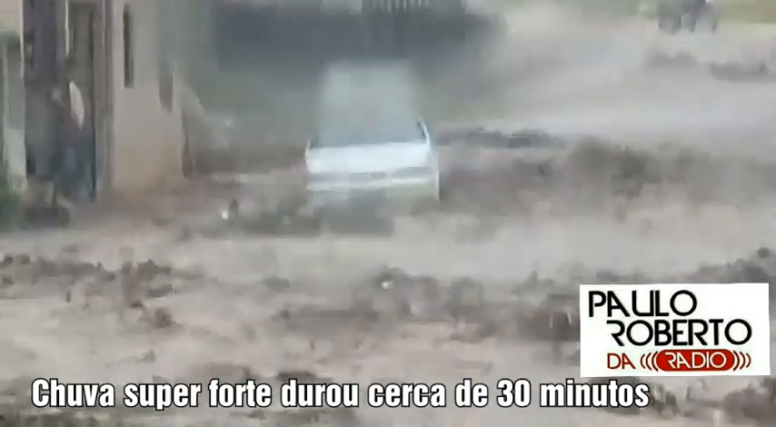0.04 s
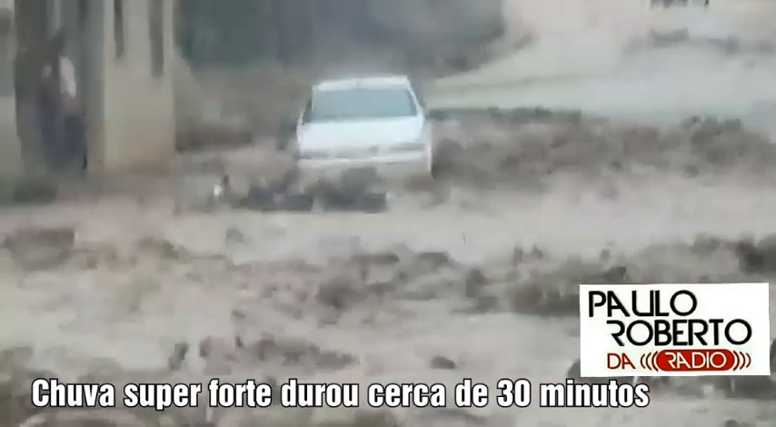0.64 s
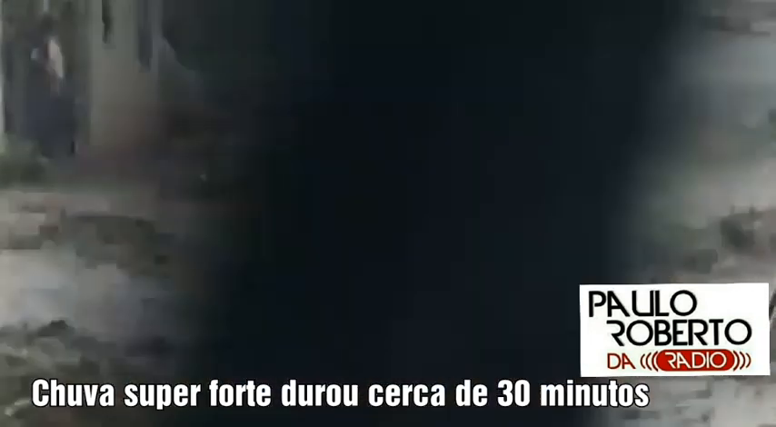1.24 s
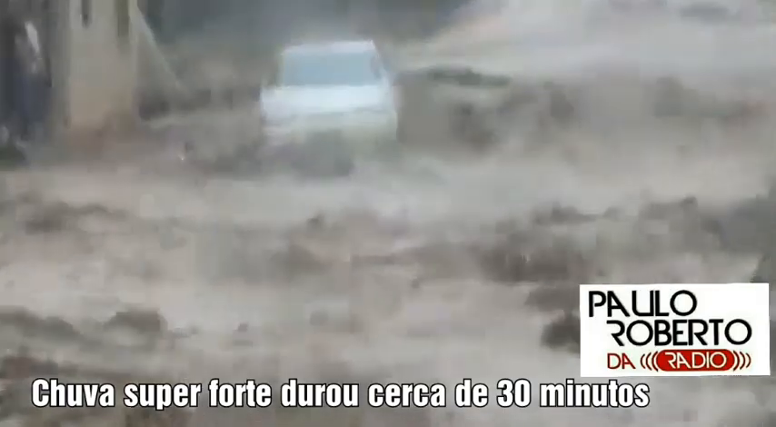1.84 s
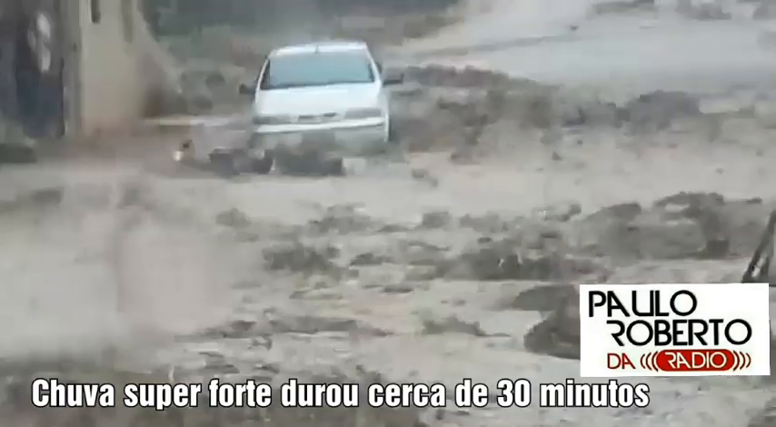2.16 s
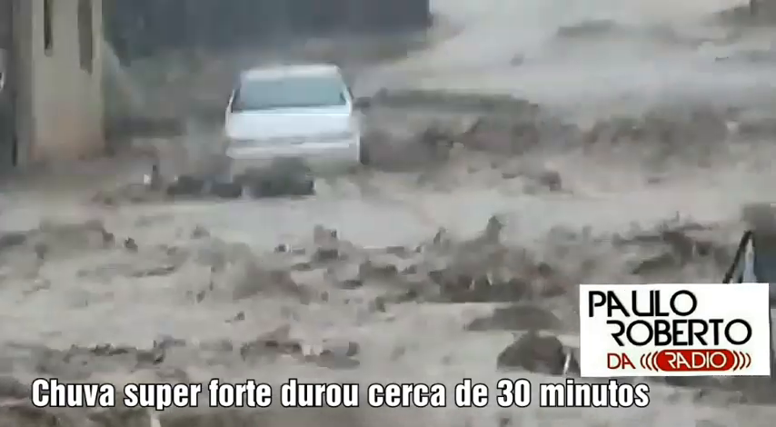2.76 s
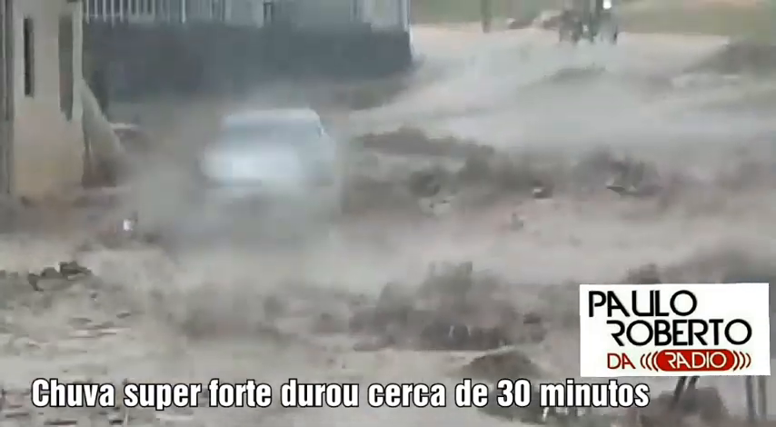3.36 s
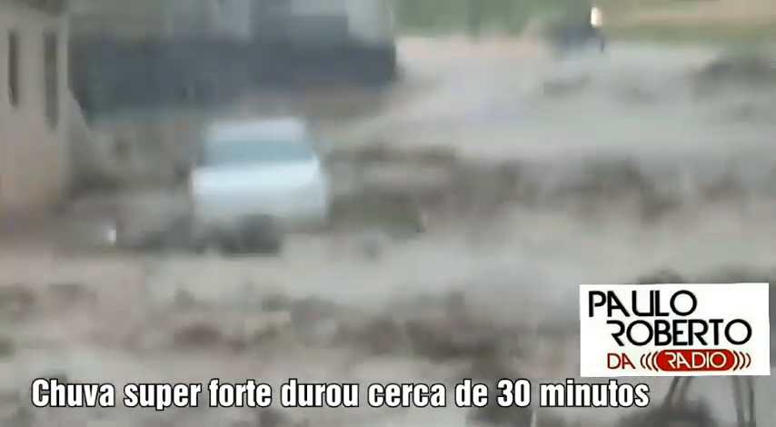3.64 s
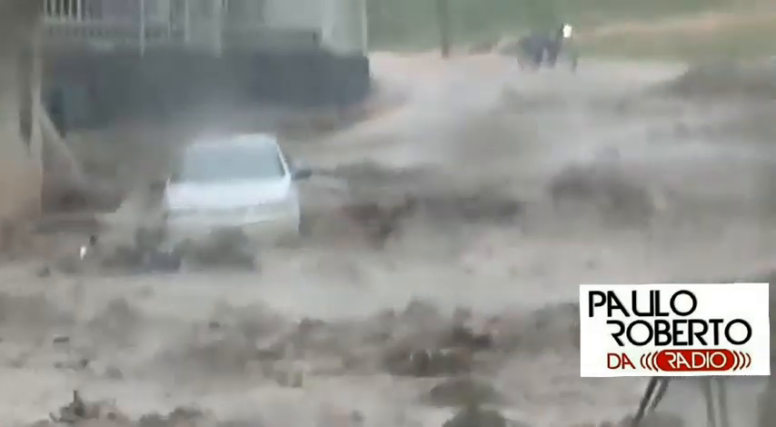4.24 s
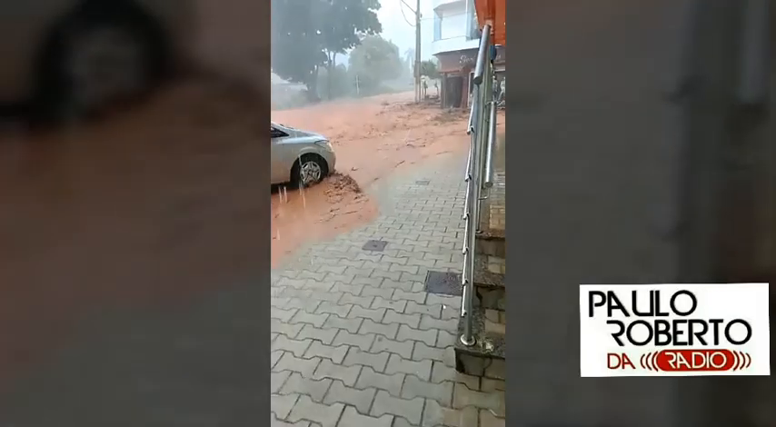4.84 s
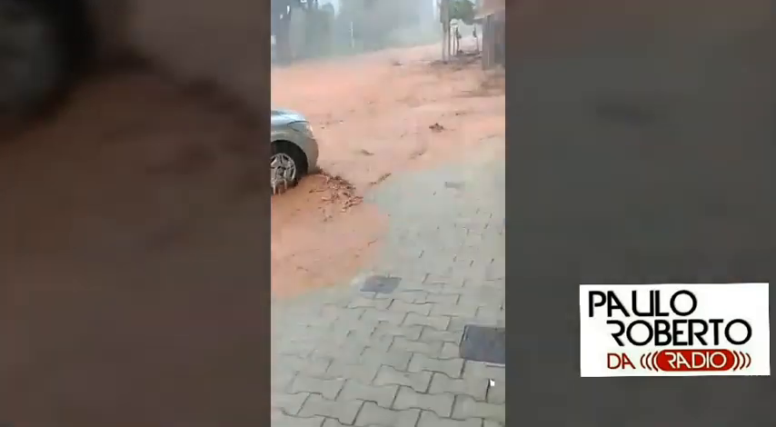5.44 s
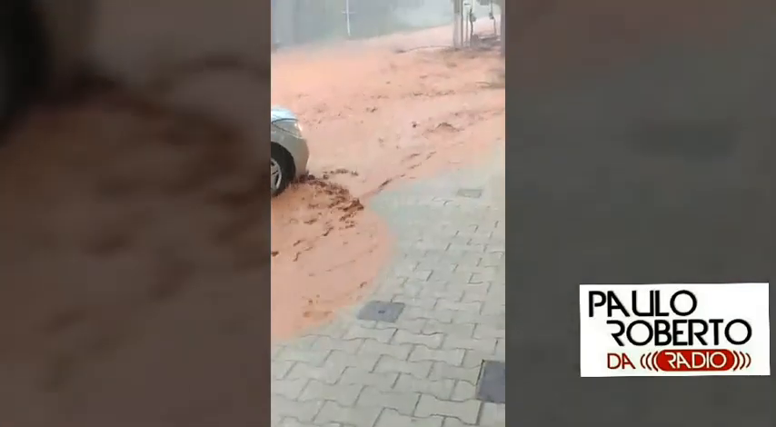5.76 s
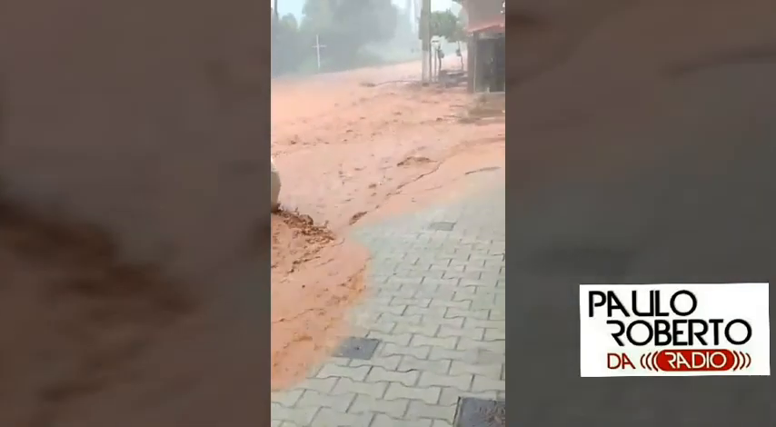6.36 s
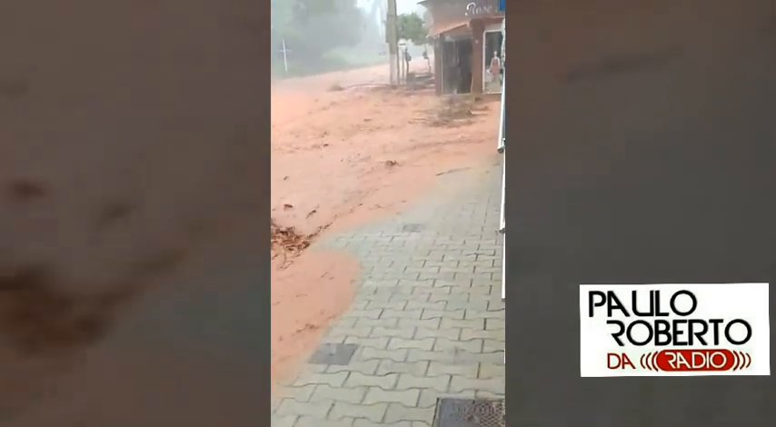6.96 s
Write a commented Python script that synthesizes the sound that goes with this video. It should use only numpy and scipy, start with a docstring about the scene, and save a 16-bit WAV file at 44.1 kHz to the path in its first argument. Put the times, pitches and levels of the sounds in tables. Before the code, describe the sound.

Muffled rain, thumping wipers and a ticking turn signal over engine hum give way to rushing water and splashing rain in a street.

```python
"""A flooded street in a downpour

First we sit in an idling car: rain drums on the body, water slaps it, the wipers thump the
windscreen and the indicator's relay (an electric switch) ticks. After a short silence we are
outdoors, where muddy water rushes down the street and raindrops spatter on the paving."""
import sys
import numpy as np
from scipy import signal
from scipy.fft import rfft, irfft
from scipy.io import wavfile
from scipy.ndimage import uniform_filter1d

SR = 44100
rng = np.random.default_rng(int(sys.argv[2]) if len(sys.argv) > 2 else 0)


def master_out(mix):
    """Clip the mix to full scale and print it as 16-bit PCM to the path in sys.argv[1]."""
    frames = np.transpose(np.atleast_2d(mix))
    ceiling = np.clip(frames, -1, 1)
    pcm = np.round(ceiling * 32767).astype(np.int16)
    wavfile.write(sys.argv[1], SR, pcm)


N = 309141
TIME = np.arange(N) / SR
CAR_ENDS_S, STREET_STARTS_S = 4.527, 4.759

# Surges in the street. Each row: time in seconds, relative level in dB of the torrent, then of the spray.
STREET_SURGES = [(4.93, -33.5, -34), (5.02, -33.5, -32.5), (5.09, -31, -33), (5.14, -34, -35),
                 (5.2, -32.5, -32.5), (5.23, -37.0, -36), (5.34, -32.5, -33.0), (5.41, -34, -32.5),
                 (5.56, -31, -31), (5.76, -31, -31), (5.83, -30, -29.5), (5.97, -27.5, -28),
                 (6.08, -30, -30), (6.2, -31, -29.5), (6.3, -33, -32), (6.45, -30, -31.5),
                 (6.6, -30.5, -29.5), (6.68, -31, -34), (6.77, -32.5, -32.5), (6.83, -30.5, -31.5),
                 (6.92, -28, -31), (6.98, -32, -31.5)]


def gain_of(db):
    """Turns decibels (dB) into a number to multiply a sound by."""
    return 10 ** (np.asarray(db) / 20)


def unit_level(x):
    """Scales a signal so that its average power is one."""
    return x / np.sqrt(np.mean(x ** 2) + 1e-20)


def at_pitch(rows, hz, column=1):
    """Reads a table's column at any frequency, sliding between rows on a musical scale."""
    table = np.transpose(rows)
    return np.interp(np.log(hz + 1), np.log(table[0] + 1), table[column])


def over_time(rows, column=1):
    """Reads a table's column at every sample, sliding between rows."""
    table = np.transpose(rows)
    return np.interp(TIME, table[0], table[column])


def add(mix, s, sound):
    """Mixes a sound in, starting at s seconds."""
    part = mix[..., max(round(s * SR), 0):][..., :sound.shape[-1]]
    part += sound[..., :part.shape[-1]]


def band(x, hz, kind, order=2):
    """Keeps what lies below hz ("lowpass") or above it ("highpass")."""
    return signal.sosfilt(signal.butter(order, hz, kind, fs=SR, output="sos"), x)


def wander(rate_hz):
    """A smooth random wobble, with up to about rate_hz swings a second."""
    hz = np.fft.rfftfreq(N, 1 / SR)
    return unit_level(irfft(rfft(rng.standard_normal(N)) / (1 + (hz / rate_hz) ** 4), N))


def ring(modes, t):
    """The tones of a struck object. Each drops by 60 dB over its fade time, t60."""
    return sum(gain_of(db - 60 * t / t60) * np.sin(2 * np.pi * hz * t) for hz, db, t60 in modes)


def burst(t60, size=4096):
    """A stereo puff of noise that starts at once and fades over t60 seconds."""
    return rng.standard_normal((2, size)) * np.exp(-np.log(1000) * np.arange(size) / SR / t60)


def patter(per_s, spread_db, t60):
    """Two streams of landing drops: many small, a few large, each a short spatter."""
    sizes = gain_of(spread_db * np.minimum(rng.exponential(1, (2, N)), 4.5))
    hits = sizes * (rng.random((2, N)) < per_s / SR)
    power = signal.lfilter([1], [1, -np.exp(-2 * np.log(1000) / (t60 * SR))], hits ** 2)
    return unit_level(np.sqrt(power) * rng.standard_normal((2, N)))


def colour(streams, spectrum, image, patchy_db, size):
    """Gives two noises a tone for each ear; image says how alike and how far out of step the ears are."""
    hz, t, (a, b) = signal.stft(streams, SR, nperseg=size, noverlap=size * 3 // 4)
    shared = image(hz[:, None], t)
    likeness = np.minimum(abs(shared), 1)
    left = a * np.exp(1j * np.angle(shared)) * gain_of(at_pitch(spectrum, hz, column=1))[:, None]
    right = likeness * a + np.sqrt(1 - likeness ** 2) * b
    right *= gain_of(at_pitch(spectrum, hz, column=2))[:, None]
    # Random louder and softer patches, smoothed across pitch and then across time.
    patches = uniform_filter1d(rng.standard_normal(a.shape), size=21, axis=0)
    patches = unit_level(uniform_filter1d(patches, size=7, axis=1))
    shaped = np.array([left, right]) * gain_of(patchy_db * patches)
    return unit_level(signal.istft(shaped, nperseg=size, noverlap=size * 3 // 4)[1][:, :N])


def engine(firing_hz=30.04, stumble_cycles=0.039):
    """The idling engine booms in the cabin: its tones peak together at each slightly uneven firing."""
    # The engine's tones. Each row: multiple of the firing rate, level in dB.
    tones = [(1, -22), (1.5, -60), (2, -32.5), (3, -38.5), (4, -43)]
    cycles = firing_hz * TIME + .58 + stumble_cycles * wander(rate_hz=12)
    out = np.zeros(N)
    for multiple, db in tones:
        unsteady = gain_of(.5 * multiple * wander(rate_hz=2.2))
        out += gain_of(db) * unsteady * np.sqrt(2) * np.cos(2 * np.pi * multiple * cycles)
    return out * gain_of([[-.25], [.25]])  # left ear, right ear


def rain_on_car(level_db=-27, flurry_db=0.77, left_lag_s=0.000496):
    """Drops drum on the roof and glass over the dull wash of the flood; the cabin rings faintly."""
    # Rain and flood heard through the body. Each row: frequency in Hz, relative dB left, then right.
    spectrum = [(45, -49.5, -47.5), (102, -50, -53), (186.6, -52.5, -55.5), (233, -60.5, -61.5),
                (355, -60, -60.5), (760, -63.5, -64.5), (1240, -67, -69), (1300, -69.5, -72),
                (1560, -65, -70), (2130, -66, -73.5), (2800, -72.5, -78), (3630, -73, -79.5),
                (4700, -84.5, -86), (8100, -88, -100.1), (9050, -91.5, -90), (13200, -100.7, -104.9)]
    # How alike the two ears sound. Each row: frequency in Hz, likeness from 0 to 1.
    likeness = [(60, 0.98), (130, 0.99), (400, 0.78), (700, 0.51), (1400, 0.2), (3000, 0.061)]
    # The cabin's hollow tones. Each row: frequency in Hz, width in Hz, relative level in dB.
    cabin_tones = [(187, 5.7, -8), (319.2, 25, -1.5), (392.3, 5.1, 5), (472.5, 2.9, -2.5), (567, 69, -8),
                   (831.6, 10.4, 2)]
    # The rain swells and eases. Each row: time in seconds, change of level in dB.
    swells = [(.2, 0), (.4, -1.5), (.7, 0), (.95, 0), (1.07, 1.6), (1.2, -0.6), (1.55, 0), (2.2, 0),
              (2.65, 0.5), (2.79, 0), (2.95, 1.1), (3.15, 0), (3.8, 0.4), (4.05, 0.3), (4.5, 0.2)]
    rain = rng.standard_normal((2, N)) + gain_of(-3) * patter(per_s=700, spread_db=1.5, t60=0.025)
    rain *= gain_of(flurry_db * wander(rate_hz=24))
    hollow = sum(gain_of(db) * signal.lfilter(*signal.iirpeak(hz, hz / width, fs=SR), rain)
                 for hz, width, db in cabin_tones)

    def image(hz, t):
        phase = -2 * np.pi * left_lag_s * np.maximum(hz - 480, 0)  # the left ear lags above the bass
        return at_pitch(likeness, hz) * np.exp(1j * phase)

    wash = colour(rain + hollow, spectrum, image, patchy_db=0.57, size=2048)
    return band(wash, 36, "highpass", order=4) * gain_of(level_db + over_time(swells))


def water_sheets(length_s=.09):
    """Now and then a sheet of water slaps the car with a short, soft swish."""
    # The slaps. Each row: time of the loudest moment in seconds, relative level in dB.
    slaps = [(.75, -26), (1.675, -22.5), (2.895, -24.5), (3.445, -26), (3.76, -26)]
    out = np.zeros((2, N))
    swell = np.hanning(round(length_s * SR))
    for s, db in slaps:
        noise = rng.standard_normal((2, SR))[:, :len(swell)]
        add(out, s - length_s / 2, gain_of(db) * swell * noise)
    return band(band(out, 1000, "highpass"), 2500, "lowpass", order=4) * gain_of([[2], [-2]])


def glass_drops():
    """Single big drops tick sharply on the glass, to the left."""
    # Drops hitting the glass. Each row: start in seconds, relative level in dB.
    drops = [(.0987, -39), (.3385, -42), (.4544, -39), (.7355, -38), (2.5162, -41), (2.5531, -37),
             (2.7282, -41), (3.043, -36), (3.3623, -37), (3.455, -35.5)]
    out = np.zeros((2, N))
    for s, db in drops:
        add(out, s, gain_of(db) * burst(t60=.025))
    return band(band(out, 3800, "highpass"), 8500, "lowpass") * gain_of([[2.5], [-2.5]])


def wipers(first_s=.523, period_s=.8142, turn_db=3):
    """The blades flop over and thump the windscreen at each turn, and more softly where they catch."""
    # The struck windscreen's tones. Each row: frequency in Hz, relative level in dB, fade in seconds.
    screen_tones = [(116.4, -16, 0.18), (149.4, -21.5, 0.16), (187.4, -22, 0.098), (282, -36, 0.36),
                    (371, -35.5, 0.17), (583, -41.5, 0.092)]
    # A blade catches in mid-sweep. Each row: start in seconds, relative level in dB.
    catches = [(.92, -3), (2.31, -1), (3.951, -2)]
    # The wet rubber edge flicks near each turn. Each row: start in seconds, relative level in dB.
    flicks = [(.5671, -38.5), (1.3693, -38.5), (2.188, -43), (2.9935, -37), (3.7264, -39)]
    # The rubber edge's tone. Each row: frequency in Hz, relative level in dB, fade in seconds.
    rubber_tones = [(5050, -6, .02)]
    out, t = np.zeros((2, N)), np.arange(SR // 3) / SR
    thump = ring(screen_tones, t) * (1 - np.exp(-t / 0.0042)) * gain_of([[2], [-2]])
    turns = [(s, turn_db) for s in np.arange(first_s, CAR_ENDS_S, period_s)]
    for s, db in turns + list(catches):
        flop = gain_of(-31) * band(burst(t60=0.14), 500, "lowpass")
        add(out, s, gain_of(db) * thump)
        add(out, s, gain_of(db) * flop)
    for s, db in flicks:
        snap = band(band(burst(t60=.05), 9300, "highpass", order=4), 11500, "lowpass", order=4)
        add(out, s, gain_of(db) * gain_of([[3], [-3]]) * snap)
        add(out, s, gain_of(db) * ring(rubber_tones, t))
    return out


def indicator_relay(first_s=.2082, period_s=.66, hold_s=.318):
    """The indicator's switch ticks as its metal arm pulls in and, much more softly, as it lets go."""
    # Tones of the arm and case. Each row: frequency in Hz, relative level in dB, fade in seconds.
    relay_tones = [(2170, -24, 0.016), (3400, -13, 0.0082), (3480, -35.5, 0.043), (4300, -26, 0.014),
                   (5930, -28, 0.0049)]
    # The tick and its echoes off dashboard and windows. Each row: delay in seconds, relative dB.
    echoes = [(0, -3.5), (.0058, -14), (.0135, -20)]
    out, t = np.zeros((2, N)), np.arange(2048) / SR
    tick = ring(relay_tones, t) * (1 - np.exp(-(t / 0.0015) ** 2))
    pull, release = gain_of(1.8) * tick, gain_of(-12) * tick
    for s in np.arange(first_s, CAR_ENDS_S, period_s):
        for delay, echo_db in echoes:
            add(out, s + delay, gain_of(echo_db) * pull)
        cabin = burst(t60=0.09)  # sound dies quickly in the padded cabin
        tail = signal.oaconvolve(pull[None], cabin / np.linalg.norm(cabin[0]), axes=1)
        add(out, s, gain_of(-10.5) * tail)
        contact_snap = band(band(burst(t60=.015), 4500, "highpass"), 8000, "lowpass")
        add(out, s, gain_of(-40.5) * contact_snap)
        add(out, s + hold_s, release)
    return out * gain_of([[3], [-2]])


def open_street(streams, sway, patchy_db, spacing_hz=1074, sway_share=.007):
    """Sound from both sides puts the ears in and out of step, at pitches that shift as we sway."""
    # The tone of the wet street. Each row: frequency in Hz, relative dB left, then right.
    spectrum = [(40, -81, -84), (150, -68, -66.5), (470, -63, -62.5), (540, -58.5, -60), (650, -60.5, -60),
                (1100, -61.5, -62), (1550, -64, -65), (2490, -59, -56.5), (3440, -67.5, -67.5),
                (4380, -59.5, -60.5), (5180, -66.8, -69), (6840, -66.5, -69.5), (7450, -70, -72.5),
                (9300, -69.5, -74), (13000, -76, -80.5), (15000, -82, -98)]
    # Where the sound comes from. Each row: frequency in Hz, likeness of the ears from 0 to 1,
    # lean from 0 (both sides alike) to 1 (right only).
    sides = [(100, .67, .4), (450, .7, .4), (900, .92, .4), (1600, .92, .42), (2150, .99, .85),
             (2700, .9, .85), (3250, .99, .45), (4300, .99, .55), (5300, .8, .45), (6400, .75, .12),
             (8400, .52, .1), (14000, .25, .1)]

    def image(hz, t):
        swayed_hz = spacing_hz * (1 + sway_share * np.interp(t, TIME, sway))
        angle = np.pi * np.maximum(hz / swayed_hz - 1, 0)
        likeness, lean = at_pitch(sides, hz, column=1), at_pitch(sides, hz, column=2)
        return likeness * (np.cos(angle) - 1j * lean * np.sin(angle))

    return colour(streams, spectrum, image, patchy_db, size=1024)


def torrent(sway, boost_db=1.15):
    """Churning water makes a wide rush full of small gurgles."""
    churn = rng.standard_normal((2, N)) + gain_of(-6) * patter(per_s=400, spread_db=3.5, t60=0.025)
    rush = unit_level(band(open_street(churn, sway, patchy_db=.5), 1780, "lowpass", order=4))
    return rush * gain_of(boost_db + over_time(STREET_SURGES, column=1))


def spray(sway, boost_db=4.5, flurry_db=.5):
    """Countless drops spatter on water and paving, in quick uneven flurries."""
    drops = rng.standard_normal((2, N)) + gain_of(-4) * patter(per_s=1500, spread_db=4, t60=0.0038)
    hiss = unit_level(band(open_street(drops, sway, patchy_db=1.12), 1790, "highpass", order=4))
    level_db = boost_db + over_time(STREET_SURGES, column=2) + flurry_db * wander(rate_hz=9.2)
    return hiss * gain_of(level_db)


def near_drops(splash_db=-3.5, flatten_s=0.00018):
    """Big drops tap and splash close by, each taking a moment to flatten on the wet ground."""
    # The landing drops. Each row: start in seconds, relative level in dB, pitch in Hz.
    drops = [(4.8714, -24, 2590), (4.9207, -21, 2930), (5.2052, -18, 2700), (5.269, -22, 2780),
             (5.3068, -25, 3100), (5.5507, -20, 2800), (5.7286, -16, 2800), (5.8117, -14, 2900),
             (5.8527, -14.5, 2950), (5.9189, -23, 2810), (5.9591, -14, 2790), (6.0626, -23, 2780),
             (6.1214, -16, 2600), (6.4035, -16.5, 2600), (6.9091, -13, 3470), (6.915, -18, 5000)]
    # The tones of one tap. Each row: multiple of its pitch, relative level in dB, fade in seconds.
    tap_tones = [(0.189, -22, 0.072), (.84, -21, 0.005), (1, 1.5, 0.0075), (1.53, -11, .005)]
    out, t = np.zeros((2, N)), np.arange(2048) / SR
    onset = 1 - np.exp(-t / flatten_s)
    for s, db, pitch in drops:
        tap = ring([(multiple * pitch, tone_db, t60) for multiple, tone_db, t60 in tap_tones], t)
        splash = band(band(burst(t60=0.061, size=2048), 2300, "highpass"), 5800, "lowpass", order=4)
        left, right = gain_of(db) * (tap + gain_of(splash_db) * splash) * onset
        add(out[0], s + 0.0006, left)  # the left ear hears it a little later
        add(out[1], s + 0.0003, right)
    return out


def scene():
    """The muffled inside of the car, a short silence, then the street fading in."""
    car = engine() + rain_on_car() + wipers() + indicator_relay() + glass_drops() + water_sheets()
    car = band(car, 12700, "lowpass", order=12)
    sway = wander(rate_hz=7.3)
    street = torrent(sway) + spray(sway) + near_drops()
    fade_out = np.clip((CAR_ENDS_S - TIME) / 0.015, 0, 1)
    fade_in = np.clip(0.14 + (TIME - STREET_STARTS_S) / 0.19, 0, 1) * (TIME >= STREET_STARTS_S)
    return car * fade_out + street * fade_in


def record(dry):
    """Cuts away the very highest treble, above 15300 Hz."""
    lowpass = signal.firwin(511, 15300, window=("kaiser", 9), fs=SR)
    return signal.oaconvolve(dry, lowpass[None], "same")


dry = scene()
out = record(dry)
master_out(out)
```